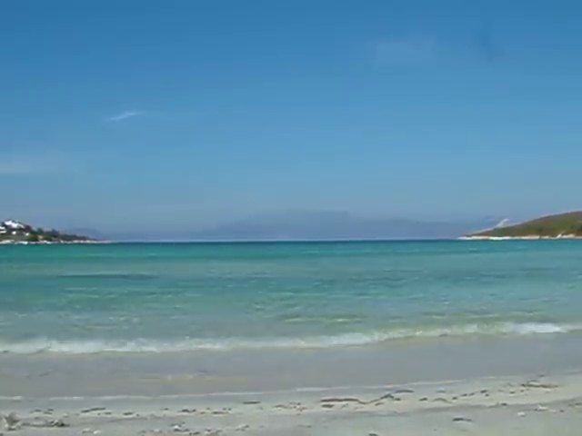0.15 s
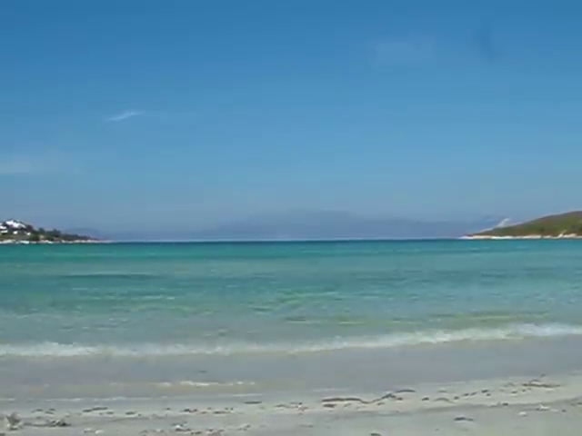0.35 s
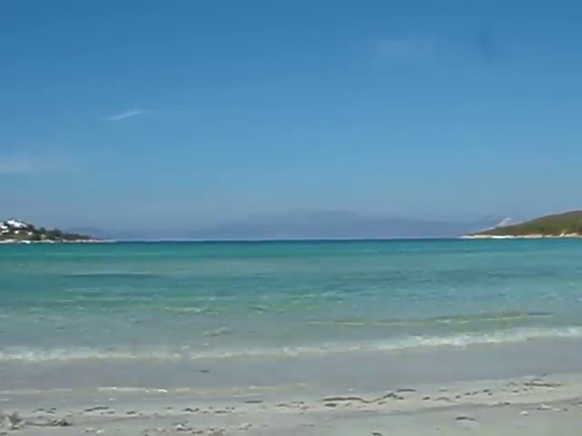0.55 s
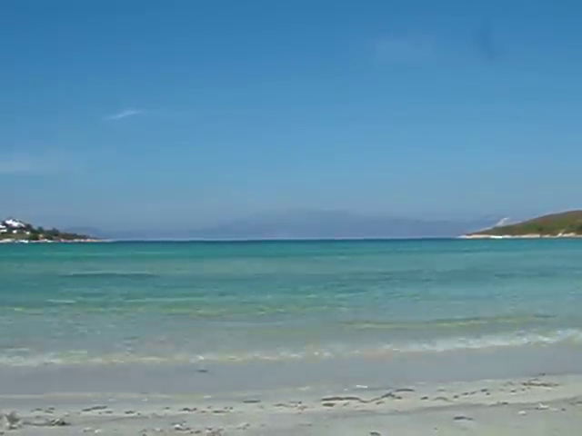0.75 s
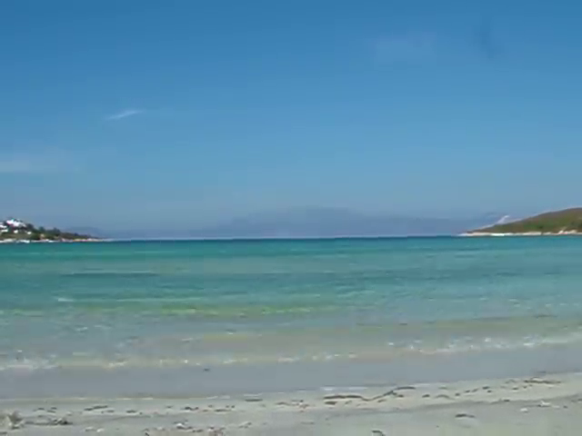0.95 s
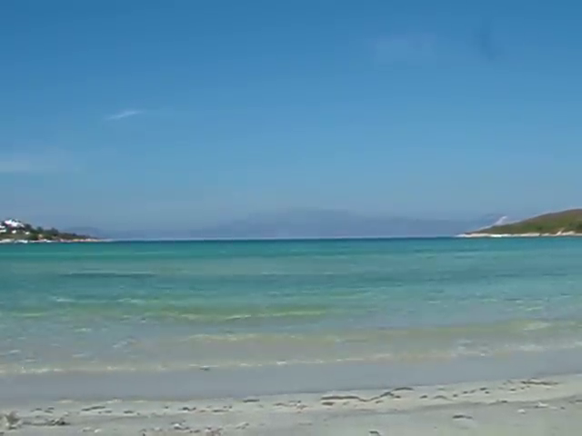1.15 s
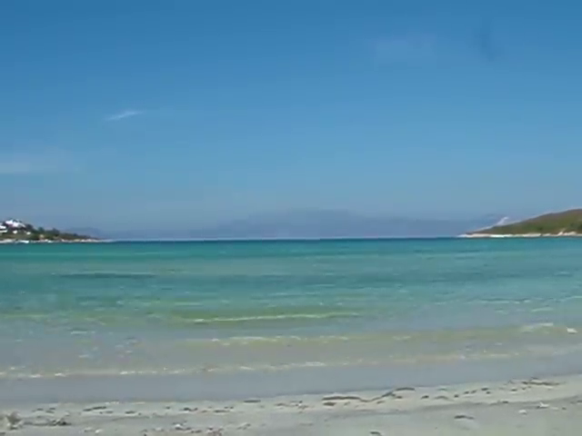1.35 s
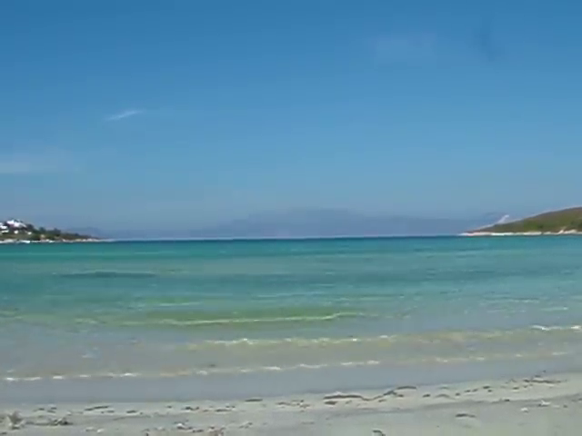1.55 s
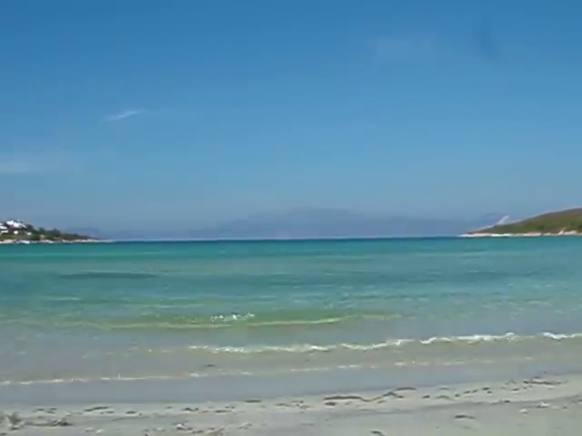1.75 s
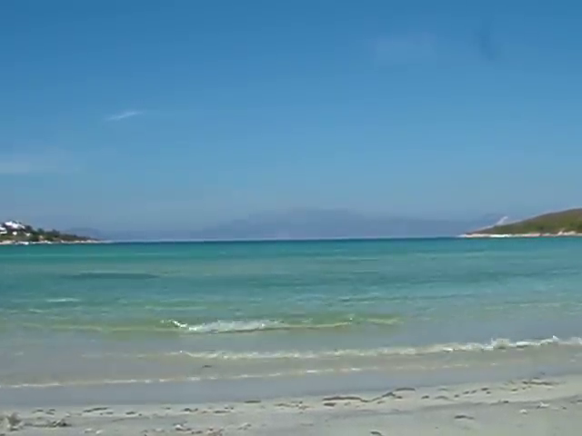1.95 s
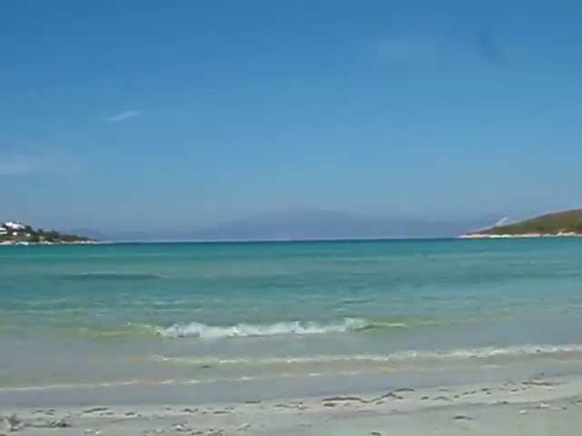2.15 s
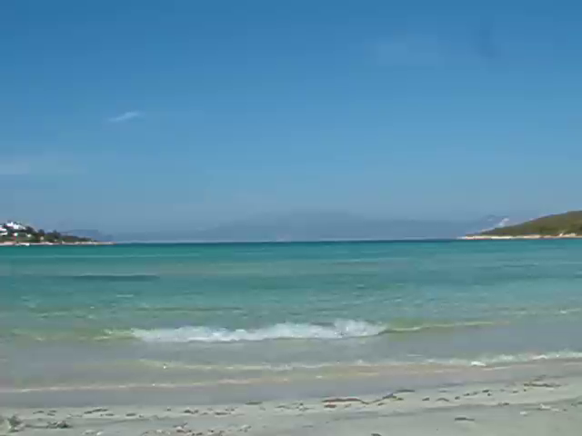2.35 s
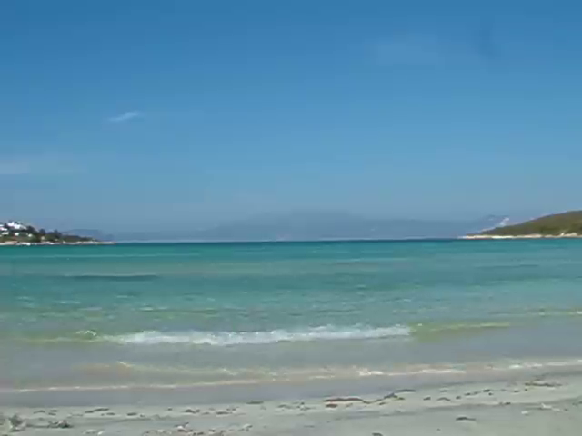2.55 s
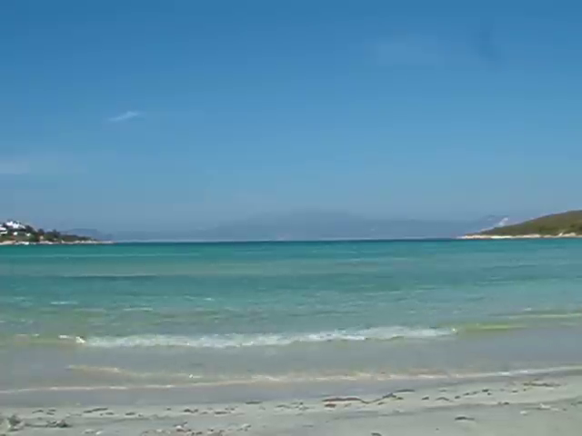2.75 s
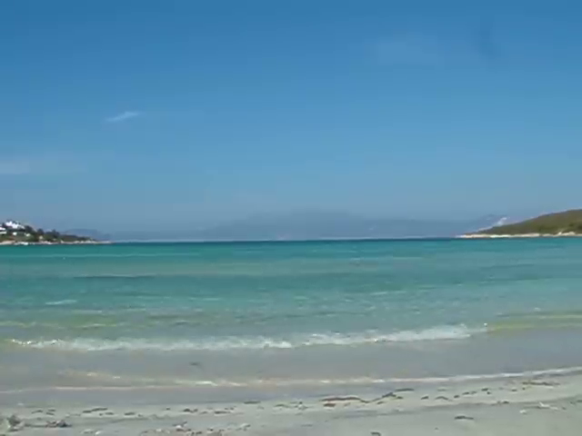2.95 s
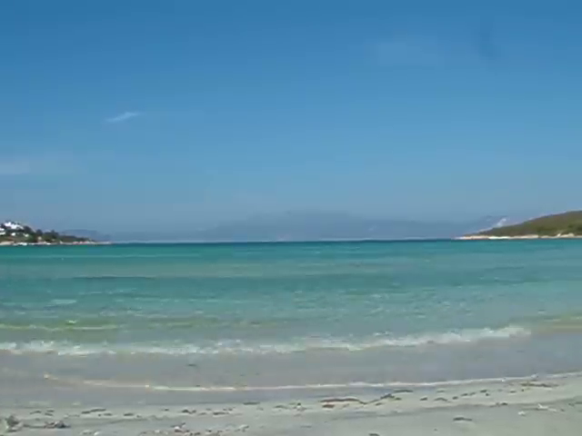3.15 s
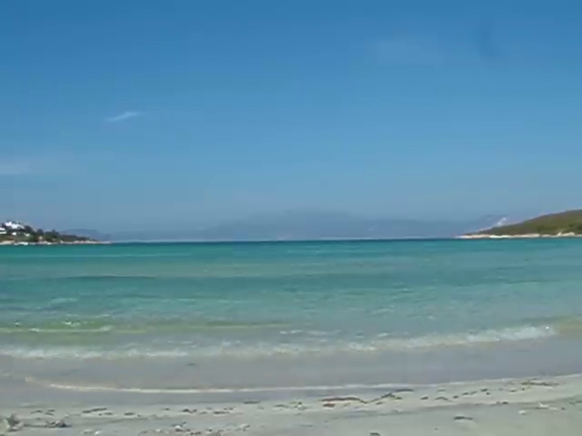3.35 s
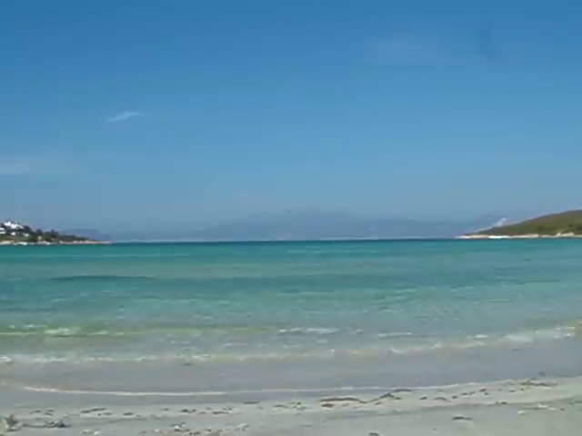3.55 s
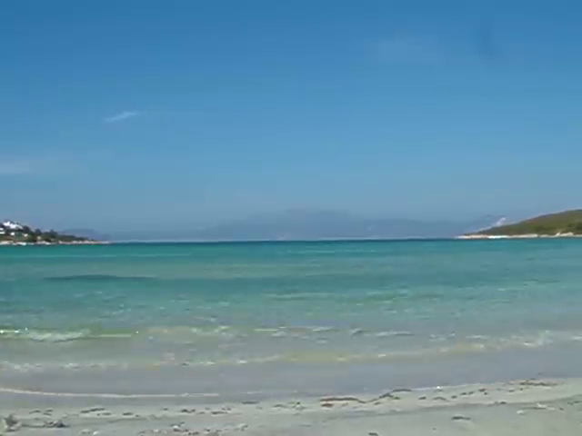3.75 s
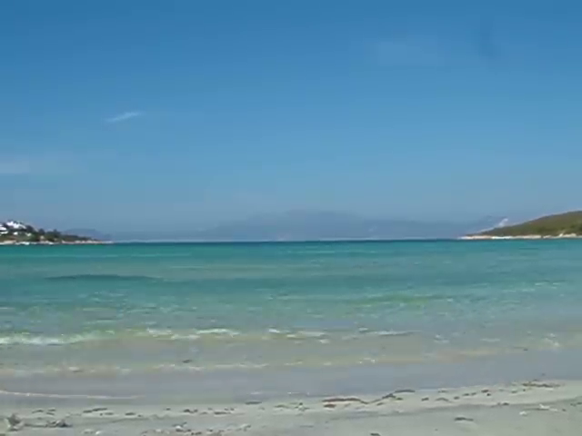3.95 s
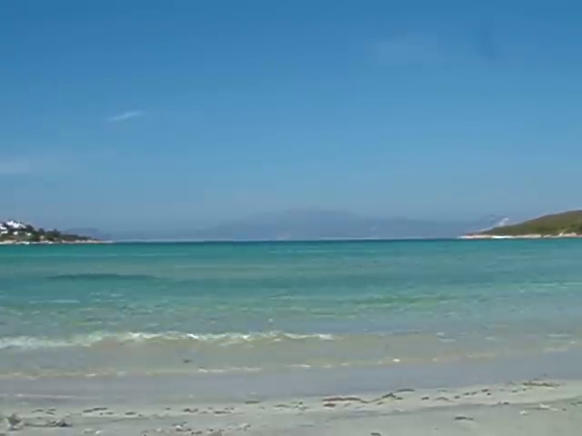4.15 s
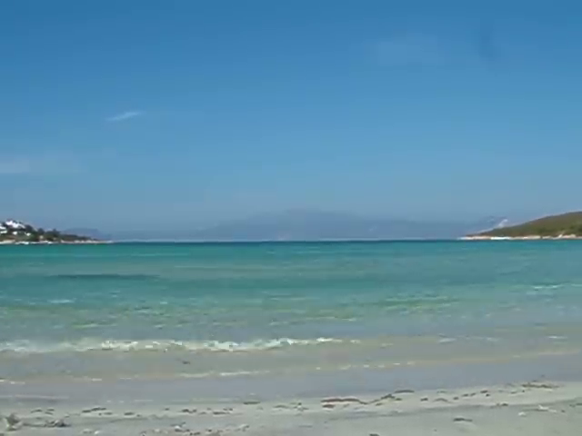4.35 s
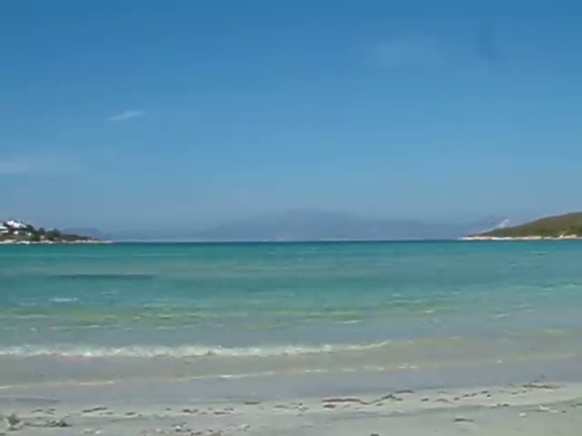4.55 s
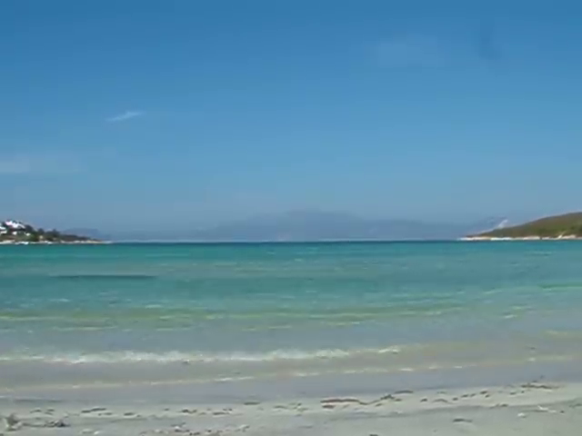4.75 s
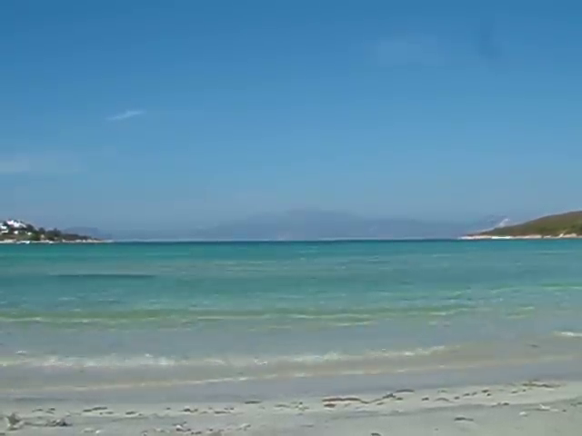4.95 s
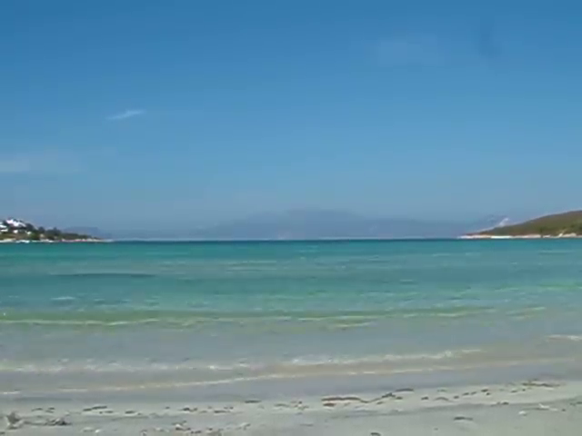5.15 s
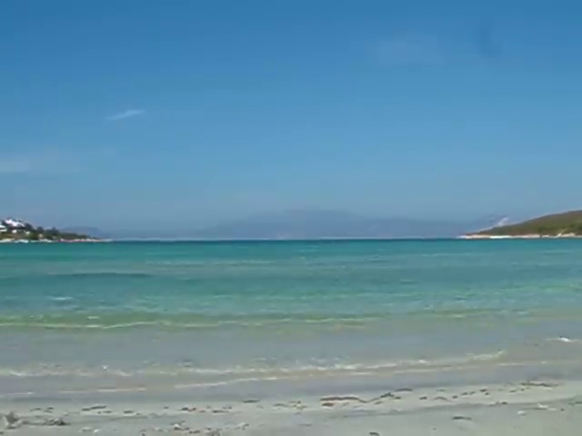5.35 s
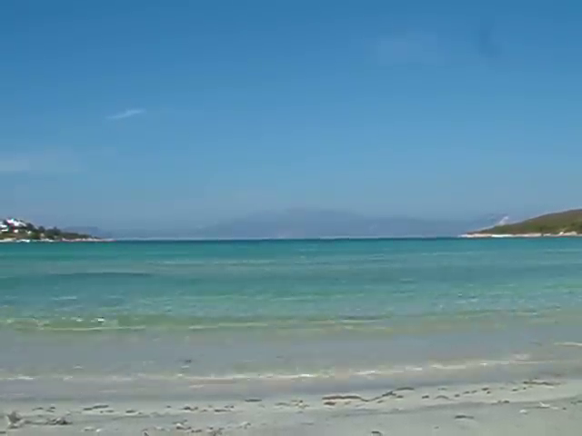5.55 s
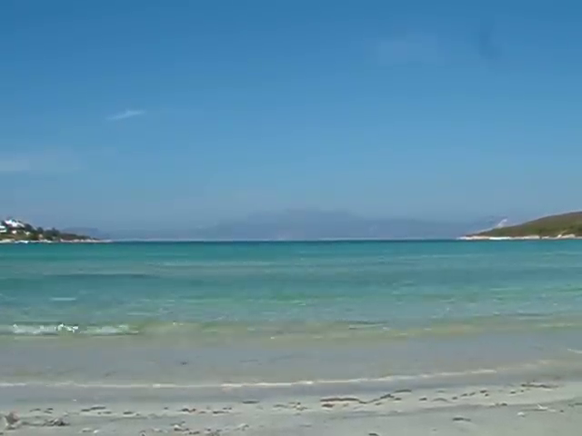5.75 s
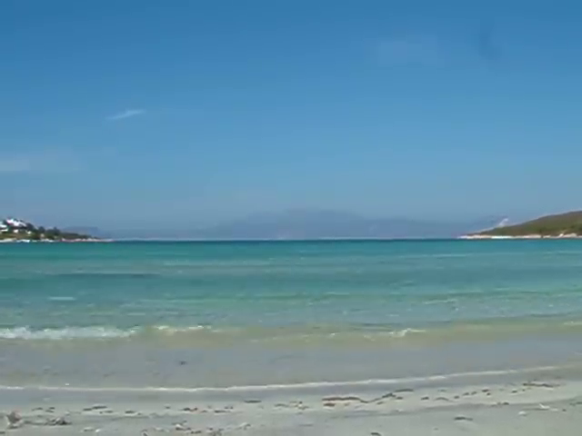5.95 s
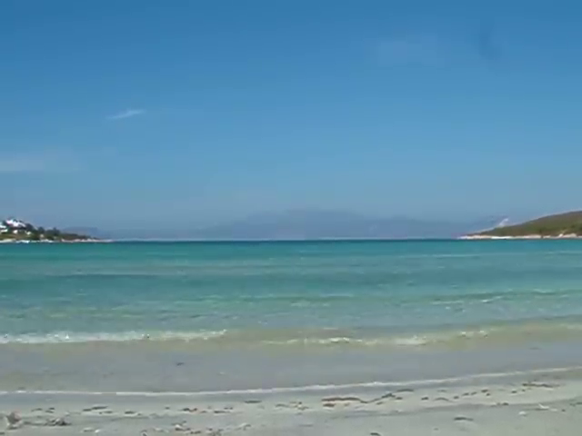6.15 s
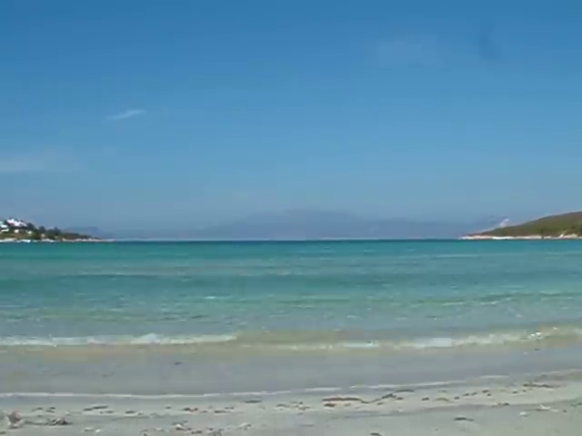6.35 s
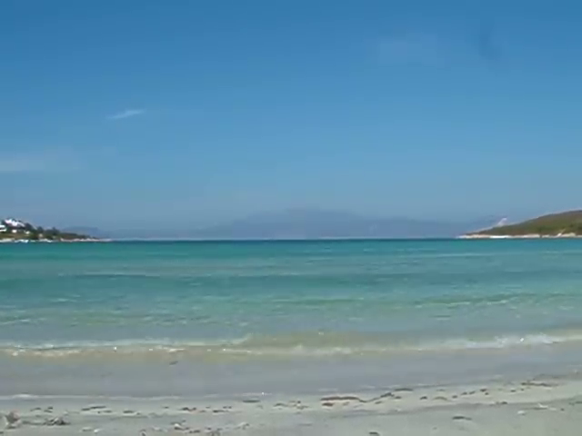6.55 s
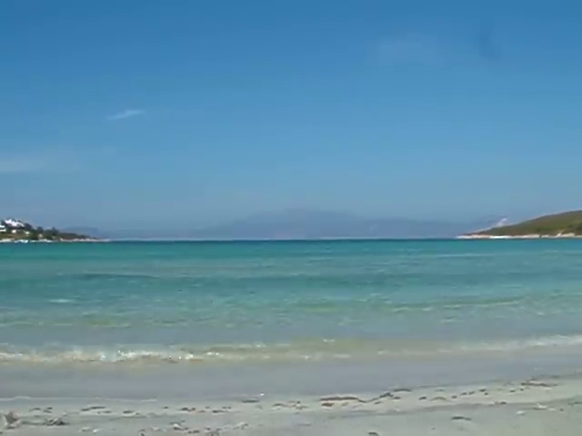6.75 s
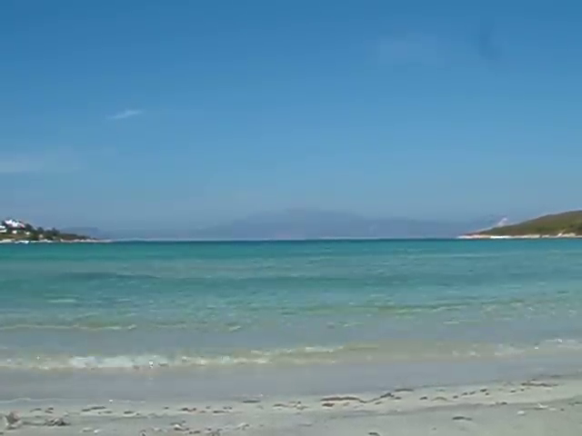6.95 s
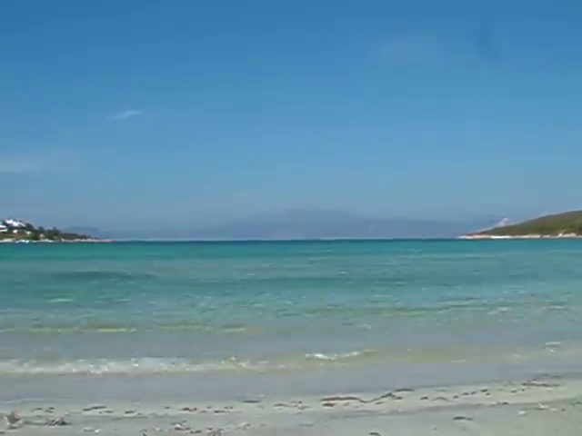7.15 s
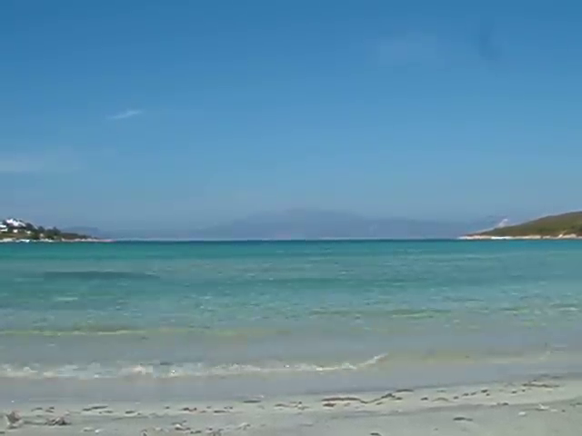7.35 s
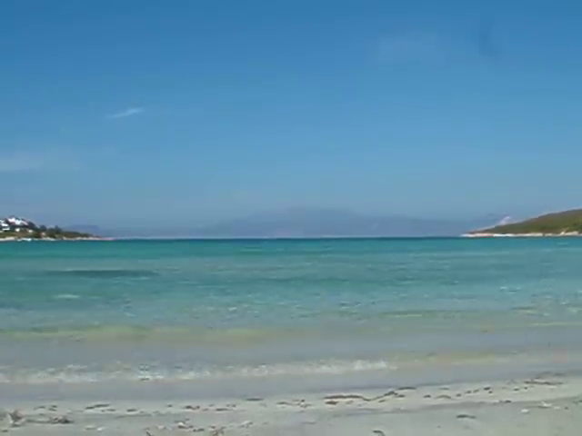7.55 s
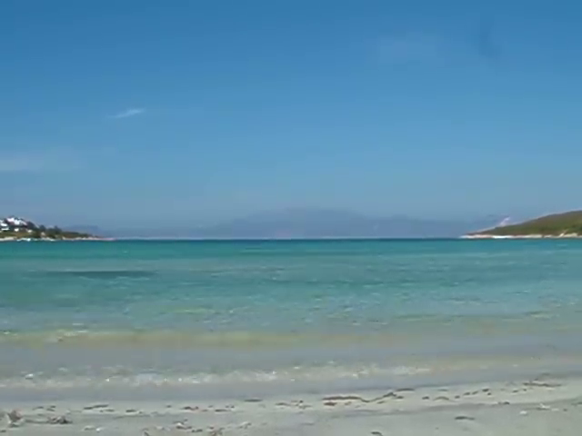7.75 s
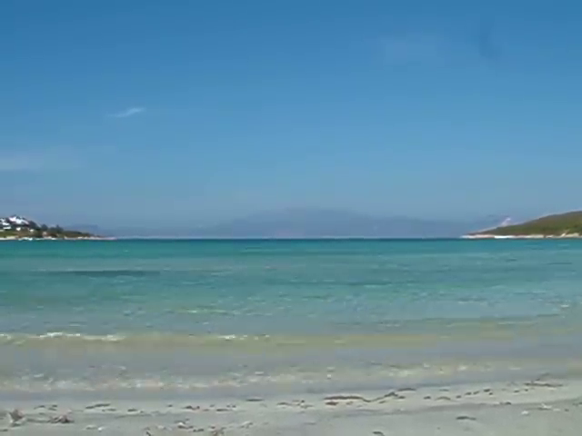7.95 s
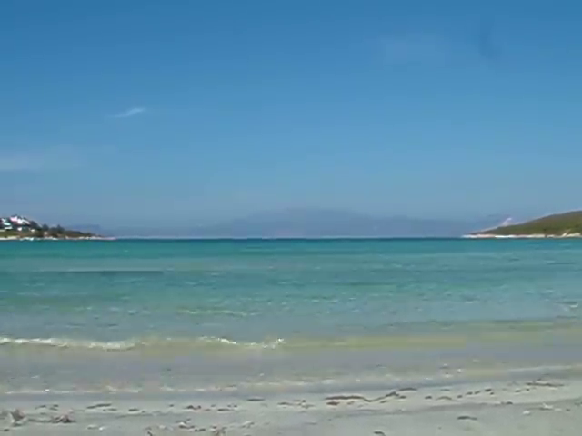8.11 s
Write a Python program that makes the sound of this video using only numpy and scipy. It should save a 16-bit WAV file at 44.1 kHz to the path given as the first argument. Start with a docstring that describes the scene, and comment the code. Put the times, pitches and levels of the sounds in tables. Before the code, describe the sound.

Gentle surf tumbles, fizzes and hisses over sand, with low wind buffeting the microphone and a few tiny ticks.

```python
"""A small wave tumbles and hisses up a sandy beach while wind rumbles on a small camera's microphone.
More waves follow: each throws fizzing spray, traps large bubbles as it rolls, then washes out as foam.
The water is noise plus many tiny ringing bubbles, with farther surf and a few sharp ticks close by.
Swirls of air thump the microphone; the hardest makes the camera turn its volume down and creep back.
The camera's electronics whine faintly throughout, and both channels carry the same sound."""
import sys
import numpy as np
from scipy import signal
from scipy.fft import rfft, irfft, next_fast_len
from scipy.io import wavfile
from scipy.ndimage import uniform_filter1d, map_coordinates

SR = 44100
rng = np.random.default_rng(int(sys.argv[2]) if len(sys.argv) > 2 else 0)


def output_pcm(signal):
    """Save a mono or channel-first signal as 16-bit PCM at the path in sys.argv[1].

    Samples are clipped to [-1, 1] before scaling.
    """
    pcm = np.clip(np.atleast_2d(signal).T, -1, 1) * 32767
    wavfile.write(sys.argv[1], SR, np.round(pcm).astype(np.int16))


N = 365148
HOP = 256  # samples between updates of a wave's level and pitch

# The waves. Each row: break time in seconds, spray level, seconds the spray holds, starting droplet
# pitch in Hz, tumble level, seconds from break to loudest tumble, wash level, seconds from break to
# loudest wash. Levels are in relative dB.
WAVES = [(-.56, -27.5, .42, 6900, -27.5, 0.94, -29.5, 1.16),
         (1.45, -41, .25, 6020, -35.5, .75, -33.5, 1.07),
         (1.798, -26.5, 0.47, 6230, -28, 0.67, -34.5, 1.61), (2.85, -44, .1, 7600, -33, 0.45, -37, 0.92),
         (3.666, -31.5, .52, 5900, -29.5, 0.71, -33.5, 1.1), (5.648, -31, 0.37, 5860, -27, 0.74, -30, 1.09),
         (6.77, -35, .52, 5550, -29.5, 0.5, -29.5, 0.65), (7.98, -35.5, .3, 7500, -38, .4, -35, 0.18)]


def amp(db):
    """Turn decibels into a number to multiply a sound by."""
    return 10 ** (np.asarray(db) / 20)


def unit(x):
    """Scale a sound to an average (rms) level of 1."""
    return x / np.sqrt(np.mean(x ** 2) + 1e-20)


def wobble(rate):
    """A smooth random curve through `rate` new values a second."""
    return map_coordinates(rng.standard_normal(4096), [np.arange(N) * rate / SR], mode="wrap")


def along(points, hz):
    """Read the gain at hz from a curve of (Hz, dB) points."""
    point_hz, db = np.transpose(points)
    return amp(np.interp(np.log(hz + 1), np.log(point_hz), db))


def filtered(x, response):
    """Multiply each frequency in x by response(hz)."""
    size = next_fast_len(len(x) + 8192)
    return irfft(rfft(x, size) * response(np.fft.rfftfreq(size, 1 / SR)), size)[:len(x)]


def coloured(x, spectrum):
    """Give x the tone of a spectrum, at an average level of 1."""
    return unit(filtered(x, lambda hz: along(spectrum, hz)))


def patchy_noise(depth_db):
    """Hiss whose low and high parts swell and fade on their own."""
    bands = signal.stft(rng.standard_normal(N), nperseg=512)[2]
    patches = uniform_filter1d(rng.standard_normal(bands.shape), size=9, axis=0)
    patches = uniform_filter1d(patches, size=12, axis=1)
    return unit(signal.istft(bands * amp(depth_db * unit(patches)), nperseg=512)[1][:N])


def bubbles(low_hz, high_hz, cycles, spread_db, count, samples):
    """Many bubbles ring and die away; each rises in pitch as it nears the surface."""
    when, pitch, rank = rng.random((count, 3)).T[:, :, None]
    turns = low_hz * (high_hz / low_hz) ** pitch * np.arange(samples) / SR
    age = turns / cycles
    rise = 1 + 0.046 * np.minimum(age, 2)
    ring = np.sin(2 * np.pi * turns * rise) * np.exp(-2 * age)
    strength = amp(-spread_db * np.log(rank + 0.012))  # a few are much louder than the rest
    at = (when * N).astype(int) + np.arange(samples)
    return unit(np.bincount(at.ravel(), (strength * ring).ravel(), N)[:N])


def ages():
    """Seconds since each wave broke, one row per wave."""
    return np.maximum(np.arange(0, N + HOP, HOP) / SR - np.array(WAVES)[:, :1], 0)


def swell(db, attack_s, hold_s, fade_db_per_s):
    """Each wave's gain: a soft rise, a hold, then a steady fade."""
    age = ages()
    rise = np.sin(np.pi / 2 * np.minimum(age / attack_s, 1))
    return rise * amp(db - fade_db_per_s * np.maximum(age - attack_s - hold_s, 0))


def climb(pitch_hz, at_s, octaves_per_s, stop_s=3.0):
    """Large bubbles burst first, so the pitch climbs, passing pitch_hz at the age at_s."""
    return pitch_hz * 2 ** (octaves_per_s * (np.minimum(ages(), stop_s) - at_s))


def swept(x, gain, centre_hz, octaves):
    """Keep one broad band of x for each wave, following its level and bubble pitch."""
    hz, _, bands = signal.stft(unit(x), SR, nperseg=2 * HOP)
    distance = np.log2((hz[:, None, None] + 1) / centre_hz) / octaves
    hump = 1 / (1 + distance ** 2) ** 2
    power = np.sum(gain ** 2 * hump / hump.mean(axis=0), axis=1)
    return signal.istft(bands * np.sqrt(power), nperseg=2 * HOP)[1][:N]


def spray(gain, pitch_hz):
    """Droplets thrown by the crest patter back on the water in little bursts."""
    hiss = patchy_noise(depth_db=-1.5)
    drops = amp(-8) * bubbles(4180, 9000, cycles=13, spread_db=5, count=12000, samples=100)
    return amp(-2.8 + 0.86 * wobble(40)) * swept(hiss + drops, gain, pitch_hz, octaves=0.5)


def tumble(gain):
    """The broken crest rolls over and traps large bubbles."""
    # The tone of rolling water. Each row: frequency in Hz, relative level in dB.
    spectrum = [(60, -15), (200, 1.5), (400, -7.5), (560, -3.5), (780, -2), (1040, -3.5), (1350, -2.5),
                (1700, -4), (2300, -3), (3500, -17.5), (6000, -22.5), (9000, -36)]
    rush = patchy_noise(depth_db=0.28)
    gurgle = amp(-12.5) * bubbles(347.6, 2030, cycles=10.9, spread_db=1.5, count=4000, samples=900)
    all_waves = np.linalg.norm(gain, axis=0)
    rolling = np.interp(np.arange(N) / HOP, np.arange(len(all_waves)), all_waves)
    return rolling * amp(0.17 * wobble(14)) * coloured(rush + gurgle, spectrum)


def wash(gain, pitch_hz):
    """Foam runs up the sand; its hiss climbs as it thins and only small bubbles are left."""
    hiss = patchy_noise(depth_db=1.1)
    foam = amp(-7.5) * bubbles(1720, 6730, cycles=6.2, spread_db=3, count=12000, samples=200)
    return amp(-1 + 0.65 * wobble(12)) * swept(hiss + foam, gain, pitch_hz, octaves=0.66)


def surf():
    """Every wave throws spray as it breaks, tumbles and washes up the sand."""
    _, spray_db, spray_s, drop_hz, tumble_db, roll_s, wash_db, run_s = np.transpose(WAVES)[:, :, None]
    # The spray builds gradually as the break runs along the crest.
    crests = spray(swell(spray_db, attack_s=0.23, hold_s=spray_s, fade_db_per_s=17),
                   climb(drop_hz, at_s=0, octaves_per_s=0.31))
    rollers = tumble(swell(tumble_db, attack_s=roll_s, hold_s=0.05, fade_db_per_s=5.5))
    foam = wash(swell(wash_db, attack_s=run_s, hold_s=0, fade_db_per_s=8.5),
                climb(pitch_hz=3430, at_s=run_s, octaves_per_s=0.51))
    return crests + rollers + foam


def shore():
    """Surf farther along the beach and old foam on the sand fill the lulls."""
    # The tone of far surf. Each row: frequency in Hz, relative level in dB.
    spectrum = [(100, -5), (600, -0.5), (1000, -7), (1400, 3), (2600, -0.5), (4000, -4), (5500, -1),
                (8000, -10.5)]
    hiss = patchy_noise(depth_db=-2.5)
    fizz = amp(-17) * bubbles(3000, 9000, cycles=21, spread_db=9, count=5000, samples=120)
    return amp(-32.5 + 0.4 * wobble(18)) * coloured(hiss + fizz, spectrum)


def wind(surge_half_s=0.075):
    """Swirls of air rumble past the microphone; faster air makes the rumble higher."""
    # The breeze. Each row: time in seconds, relative level in dB, air speed (1 is usual).
    breeze = [(0, -27, 1.05), (.79, -25.5, 0.81), (.93, -20, 0.77), (1.21, -18.5, 0.73), (1.3, -30, .8),
              (1.72, -36.5, .9), (1.88, -29.5, .86), (2.5, -27, 0.83), (2.95, -26, 0.89),
              (3.35, -25.5, 1.02), (3.65, -18.5, 1.147), (4.1, -21.5, 1.14), (4.6, -19, .96),
              (5.5, -24.5, .97), (6.15, -23.5, 1.09), (6.6, -19, 1.08), (7.65, -22, 1.106),
              (8.05, -22.5, 0.91), (8.28, -30.5, 0.87)]
    # Brief gusts. Each row: time in seconds, dB above the breeze.
    surges = [(.56, 4), (2.06, 2.5), (3.55, 0.5), (4.4, 1.5), (5.33, 1), (5.8, 5), (6.39, 2), (7.24, 4),
              (7.8, 3.5)]
    # The rumble's tone at the usual speed. Each row: frequency in Hz, relative level in dB.
    spectrum = [(12, -27), (25, -17.5), (40, -12.5), (62, -6), (100, -0.5), (140, 0), (180, -5), (250, -12),
                (350, -15.5), (500, -22), (1000, -29), (3000, -57.5)]
    t = np.arange(N) / SR
    times, levels, speeds = np.transpose(breeze)
    breeze_db, speed = np.interp(t, times, levels), np.interp(t, times, speeds)
    surge_db = sum(db * np.exp(-((t - s) / surge_half_s) ** 2) for s, db in surges)
    swirls = coloured(rng.standard_normal(2 * N), spectrum)
    rumble = map_coordinates(swirls, [np.cumsum(speed)], order=1, mode="wrap")
    return amp(breeze_db + surge_db + 0.67) * unit(rumble * amp(1.7 * wobble(25)))


def whine(hz=7124):
    """The camera's electronics give off a faint, steady tone."""
    return amp(-50.5) * np.sin(2 * np.pi * hz * np.arange(N) / SR)


def thumps(ragged_octaves=0.5):
    """A hard swirl sucks at the microphone's opening: a short swing of pressure with no steady pitch."""
    # Each row: time in seconds, peak level in dB, rough pitch in Hz, half length in seconds.
    hard_swirls = [(0.207, -8.5, 506, 0.00051), (1.218, -12, 180, .0036), (1.227, -2, 171, 0.0018),
                   (2.633, -13, 400, 0.002), (2.83, -5.5, 272, 0.0057), (3.327, -15.5, 200, .0035),
                   (6.2254, -9, 190.1, .0024), (6.234, -6, 566, 0.00099), (6.344, -15, 260.7, .0022),
                   (6.389, -7, 149, .012)]
    out, t = np.zeros(N), np.arange(N) / SR
    uneven_time = np.cumsum(2 ** (ragged_octaves * wobble(600))) / SR
    for s, db, hz, half_s in hard_swirls:
        turns = hz * (uneven_time - uneven_time[round(s * SR)])
        out -= amp(db) * np.cos(2 * np.pi * turns) * np.exp(-((t - s) / half_s) ** 2)
    return out


def ticks(decay_s=0.0008):
    """Small, sharp ticks close by each ring for about a millisecond."""
    # Each row: start in seconds, level in dB, pitch in Hz.
    pings = [(.229, -17, 7940), (1.362, -14, 4770), (3.105, -19, 7930), (3.228, -15.5, 7970),
             (3.436, -20, 7700), (3.861, -12.5, 7270), (5.33, -18, 5005), (5.437, -17, 6200),
             (7.15, -16.5, 7940)]
    out, t = np.zeros(N), np.arange(1024) / SR
    for s, db, hz in pings:
        out[round(s * SR):][:len(t)] += amp(db) * np.sin(2 * np.pi * hz * t) * np.exp(-t / decay_s)
    return out


def gain_control(x, ceiling_db, release_db_per_s, react_s=0.0007):
    """A peak over the ceiling quickly turns the volume down; it creeps back at a steady rate."""
    over_db = np.maximum(20 * np.log10(np.abs(x) + 1e-9) - ceiling_db, 0)
    creep_db = release_db_per_s * np.arange(N) / SR
    cut_db = np.maximum.accumulate(over_db + creep_db) - creep_db
    lag = np.exp(-1 / (react_s * SR))
    return x * amp(-signal.lfilter([1 - lag], [1, -lag], cut_db))


def scene():
    """Surf and wind reach one microphone, which feeds both channels."""
    mono = surf() + shore() + wind() + whine() + thumps() + ticks()
    return np.array([mono, mono])


def record(dry):
    """The microphone dulls the highs; the hardest thump clips before the volume drops."""
    # The microphone's tone. Each row: frequency in Hz, boost or cut in dB.
    microphone = [(20, -5.5), (50, 0), (1550, 0.5), (1880, -4.5), (2300, -2), (3300, -0.5), (4200, 0),
                  (5200, 0.2), (6500, -1), (7200, -3), (7900, -7.5), (8400, -15.5), (8800, -27),
                  (9100, -38)]
    heard = filtered(dry[0], lambda hz: along(microphone, hz) * (hz < 9050))
    ducked = gain_control(heard, ceiling_db=-5.5, release_db_per_s=3)
    clipped = np.clip(ducked, -0.707, 0.707)
    mono = filtered(clipped, lambda hz: hz < 16000)
    return np.array([mono, mono])


dry = scene()
out = record(dry)
output_pcm(out)
```